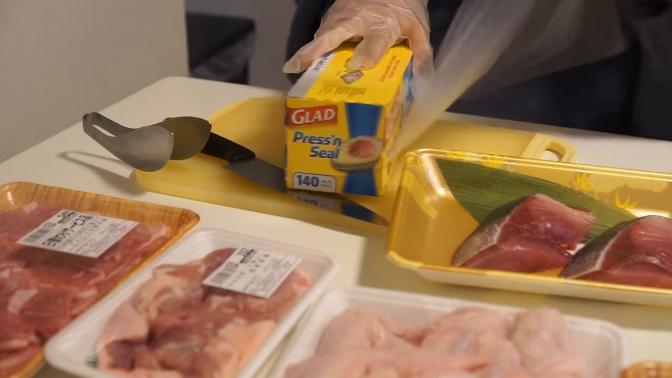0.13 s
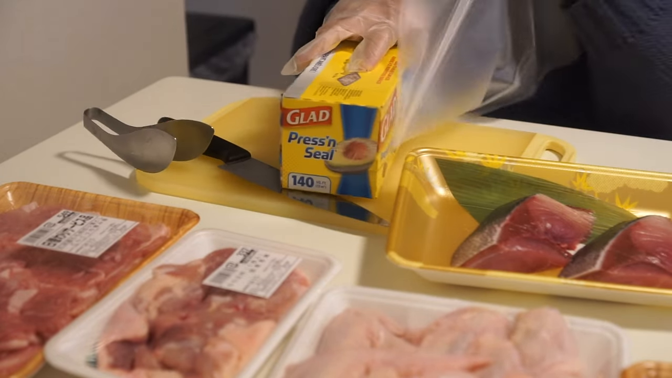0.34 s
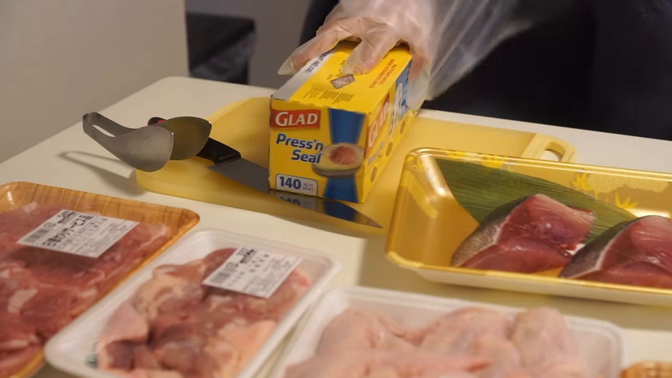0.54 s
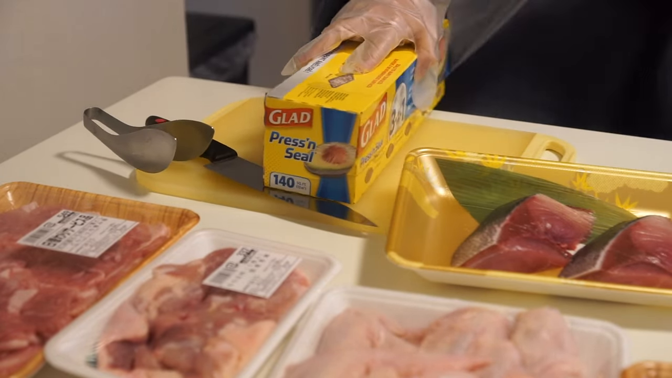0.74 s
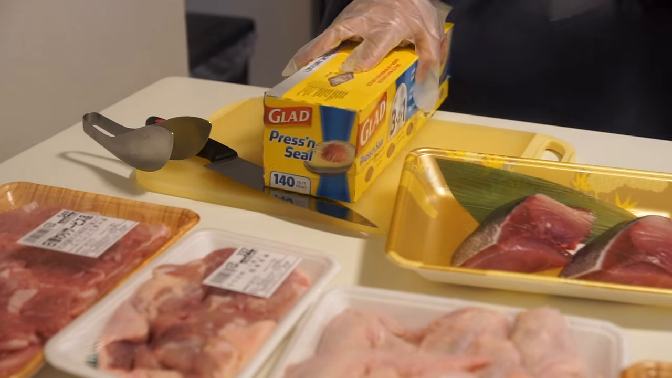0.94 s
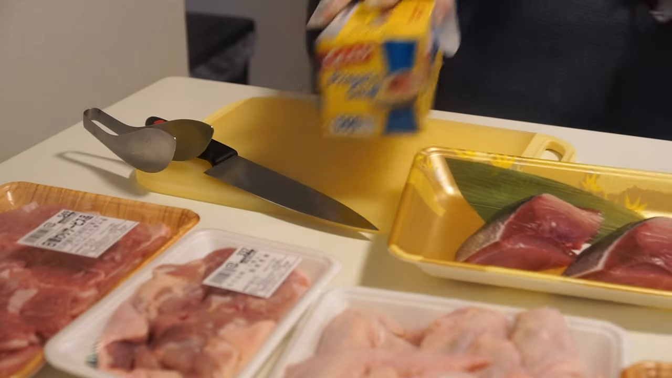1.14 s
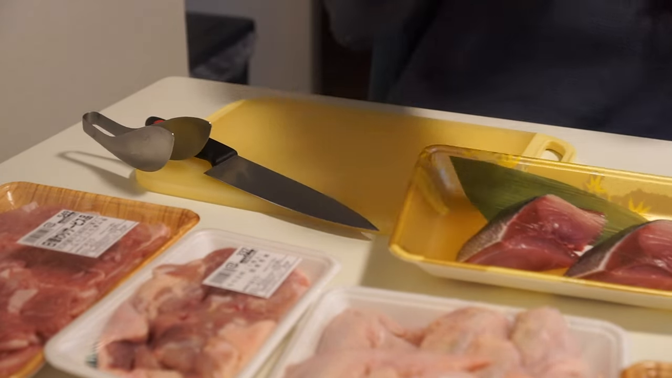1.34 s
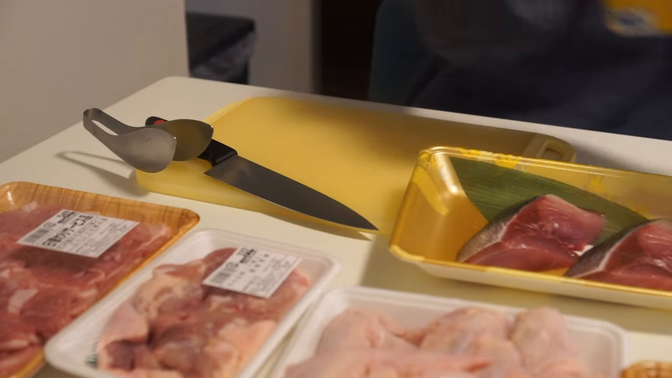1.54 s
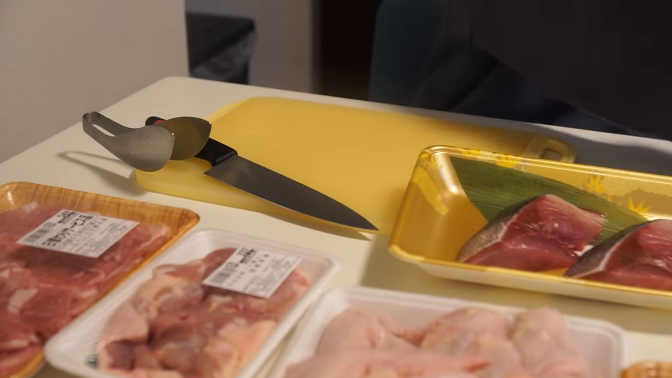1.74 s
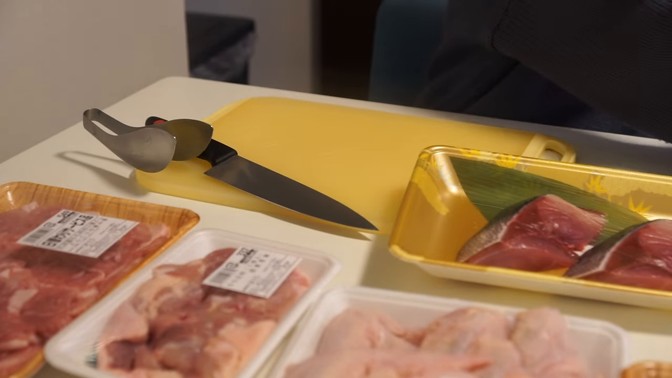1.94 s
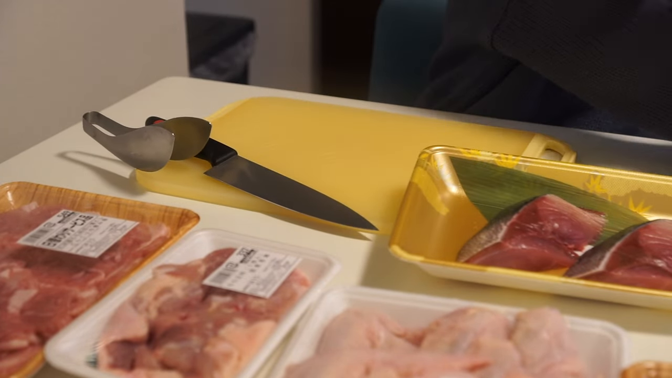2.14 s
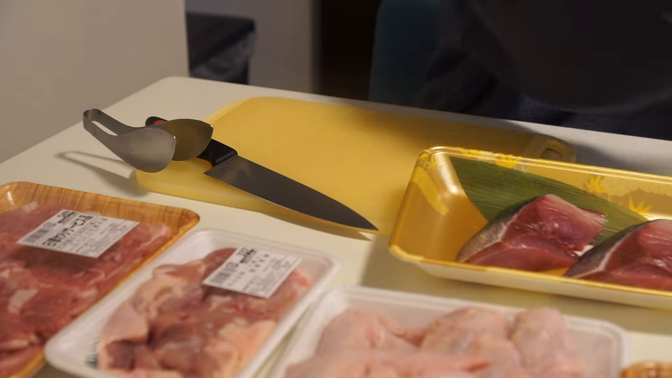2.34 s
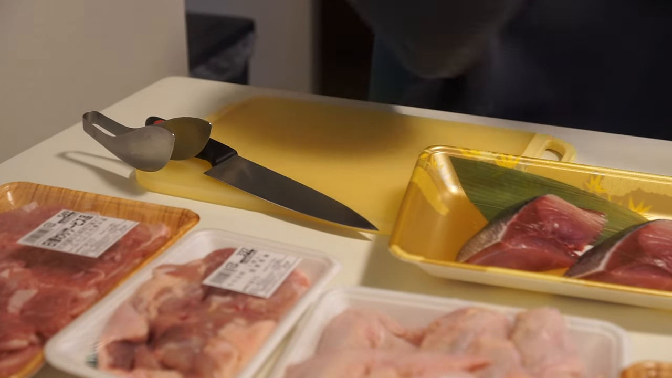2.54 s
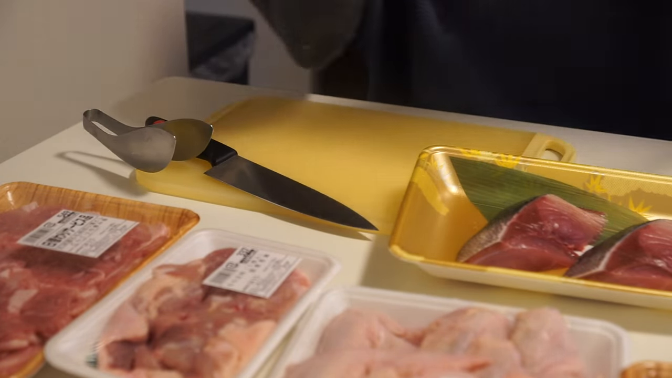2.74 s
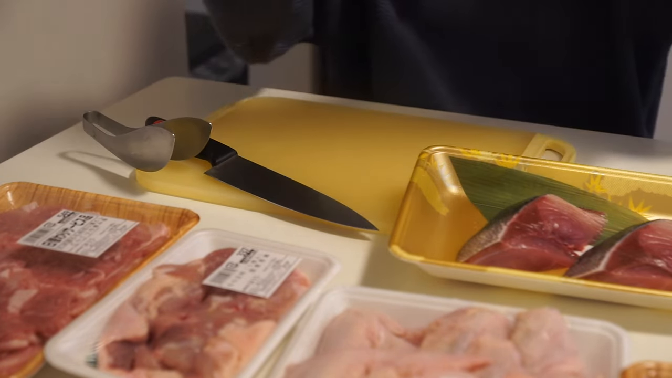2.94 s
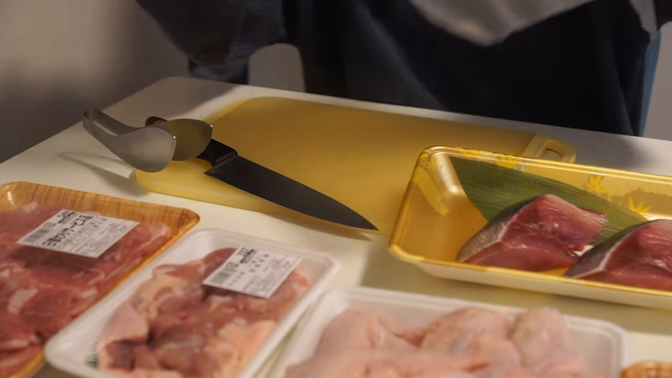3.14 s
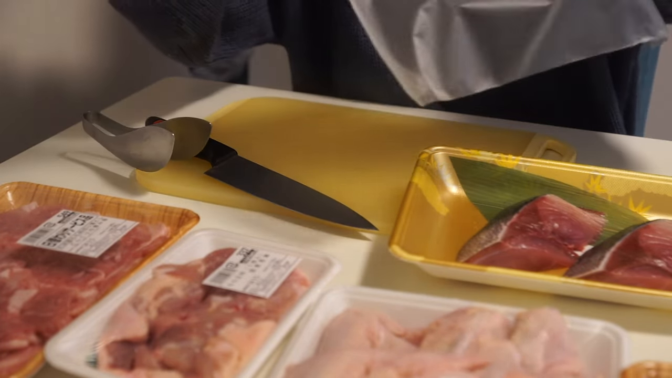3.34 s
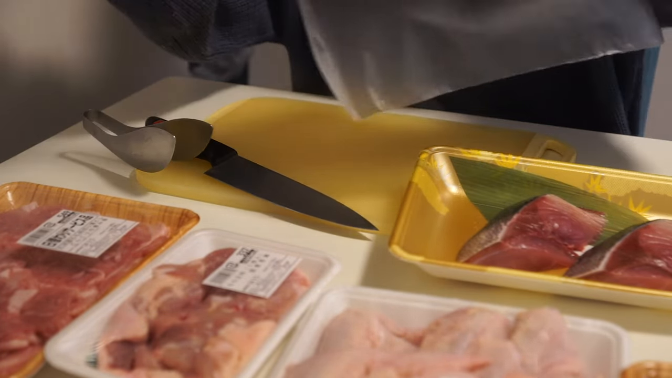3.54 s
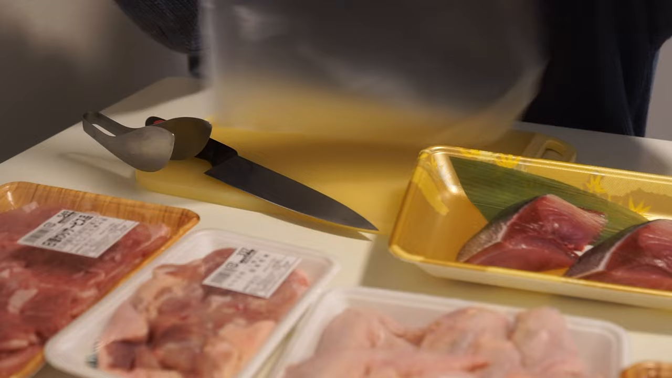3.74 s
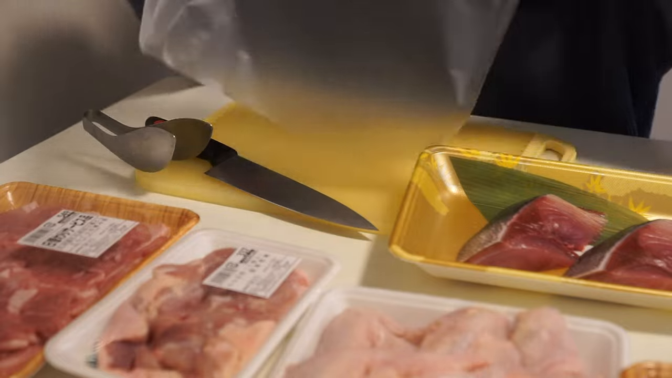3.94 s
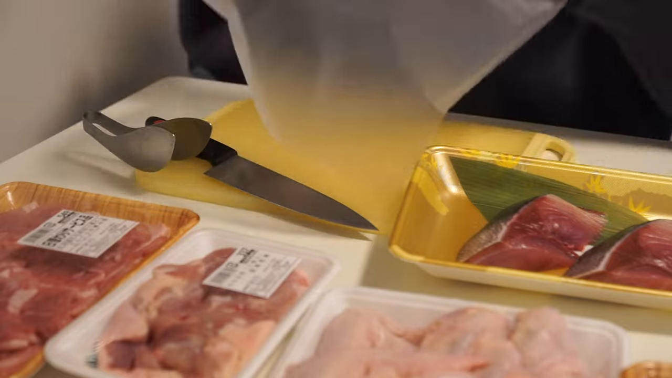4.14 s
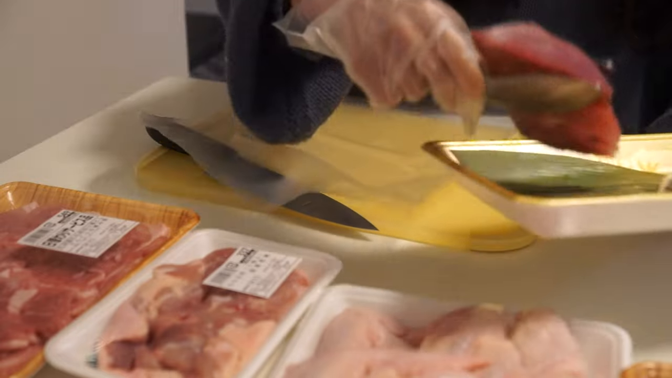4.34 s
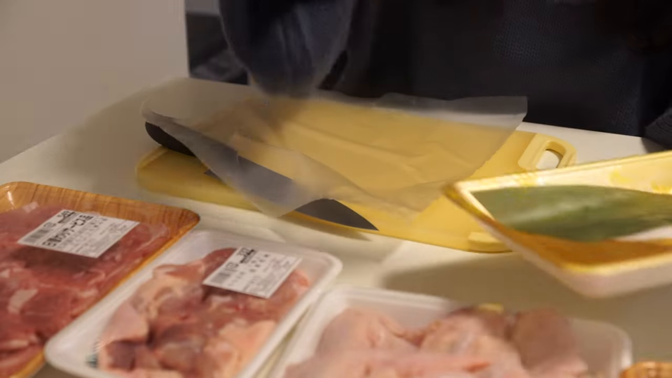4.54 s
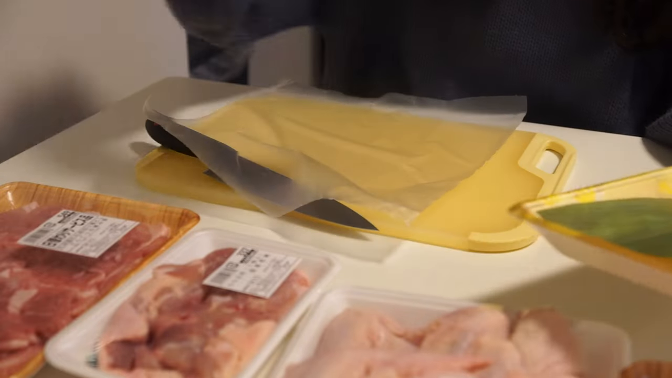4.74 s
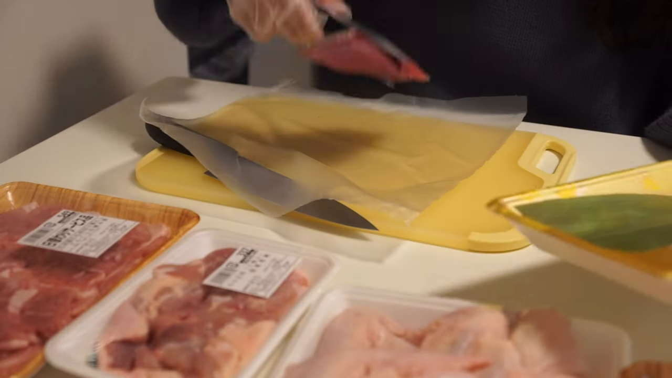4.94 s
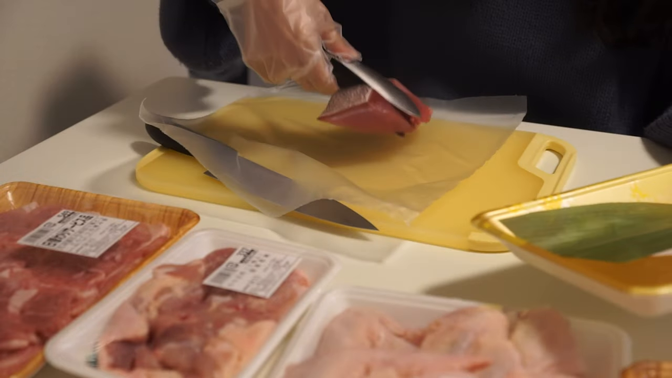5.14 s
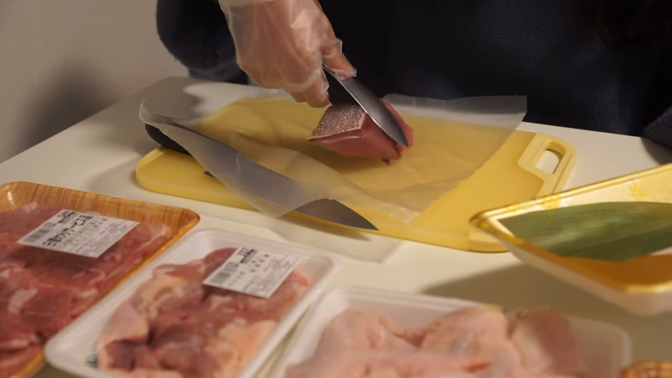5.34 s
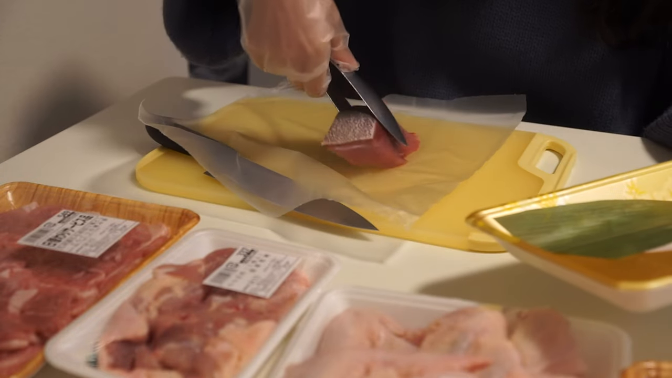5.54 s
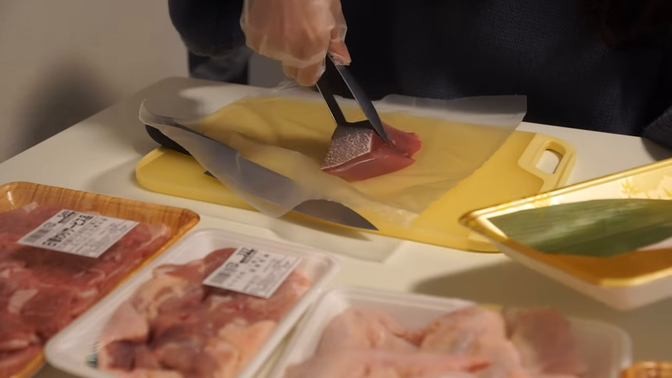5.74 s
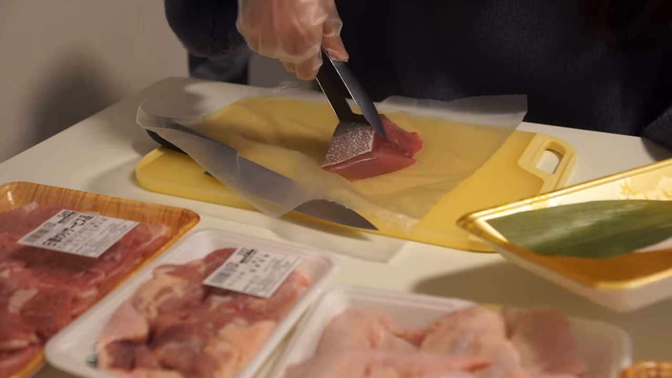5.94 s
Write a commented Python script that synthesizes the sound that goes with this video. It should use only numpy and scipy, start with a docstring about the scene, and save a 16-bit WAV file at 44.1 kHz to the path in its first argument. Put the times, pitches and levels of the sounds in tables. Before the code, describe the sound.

A close stereo microphone in a small kitchen with a short room tail, over low background noise and faint hiss. From the start, sticky plastic wrap peels from a boxed roll: dense bright crackle swells to its loudest around 0.45 to 0.7 seconds, while the roll jerks and drums the hollow cardboard. A snap and box knock come at 0.85, then a strong sharp crack near 1.17 as the film comes free. Quiet follows, until the box is set down with a firm hollow knock at 1.85 and smaller bumps to 2.04. Only faint crinkles and ticks remain until 3.3, when the sheet is shaken out, rustling and snapping to about 3.9. It settles with soft brushing; dull tray and table bumps come at 4.5 to 4.9. Tongs clack lightly at 5.37, then meat drags and taps on the plastic board around 5.6 to 5.75, with small film crinkles.

```python
"""Plastic wrap at a kitchen table

Sticky wrap is peeled off its boxed roll, torn, shaken out and spread: filtered crackle and snapping creases.
The box is knocked and set down, a foam tray is moved and tongs drop meat on a plastic board:
slips and blows excite resonant modes. Sleeves brush and the table thuds, as shaped noise.
A decaying diffuse tail answers from the room, over background noise and hiss.
"""
import sys
import numpy as np
from scipy import signal
from scipy.fft import rfft, irfft, next_fast_len
from scipy.io import wavfile
from scipy.ndimage import map_coordinates

SR = 44100
rng = np.random.default_rng(int(sys.argv[2]) if len(sys.argv) > 2 else 0)


def wrap_up_sound(samples):
    """Save the sound to the file named by the first command line argument, as 16-bit audio."""
    columns = np.atleast_2d(samples).T
    # keep every value between -1 and 1, then stretch to whole-number steps
    tamed = np.clip(columns, -1, 1)
    steps = np.round(tamed * 32767).astype(np.int16)
    wavfile.write(sys.argv[1], SR, steps)


N = 264600  # samples, 6 s

# Movements of the wrap. Each row: time the full level is reached in seconds (the rise comes before it),
# rustle level in dB, rise, hold and fall in seconds,
# flapping and crispness in dB relative to the rustle, left minus right in dB.
WRAP_MOVES = [ (0.0, -43.5, .1, 0.01, 0.23, -4.5, 0, 0.5), (0.238, -35.5, 0.32, 0.01, 0.13, -4, -1.5, 1),
              (0.317, -33.5, .01, 0.011, 0.084, -8.5, -1.5, 1.5),
              (0.359, -34.5, .012, 0.078, 0.25, 1.5, 3, 1), (0.46, -29.5, 0.28, 0.14, 0.26, -3, 0, 1),
              (0.6, -30, 0.27, 0.095, .22, -5, -1.5, 1), (0.84, -36, 0.017, 0, 0.24, 3.5, -2.5, 1),
              (1.098, -35, 0.017, 0.0077, 0.07, 0, -11, 1.5), (1.163, -35, .05, 0.022, 0.16, 3.5, -4.5, .5),
              (1.513, -61, .1, 0.4, 0.52, -1, -2, -0.5), (1.98, -57.5, 0.44, 0.088, 0.24, 2, -3, 0),
              (2.13, -50.5, 0.093, 0.0061, .15, -12, -6, .5),
              (2.248, -59.5, 0.38, 0.12, 0.32, -3.5, -0.5, -.5),
              (2.434, -61.5, 0.11, 0.017, .1, 5.5, -2, .5), (2.52, -60.5, 0.13, 0.21, .3, -0.5, 1, .5),
              (2.74, -57.5, 0.22, 0.02, 0.17, -2, -1, -6), (3.196, -53.5, 0.088, 0.21, .3, -2.5, -0.5, 0.5),
              (3.394, -43.5, 0.46, 0.024, .2, -2, 0.5, 1), (3.455, -36.5, 0.12, 0.022, 0.12, -6, 0.5, 1),
              (3.505, -40.5, 0.054, 0.014, 0.07, -5.5, -0.5, 1),
              (3.537, -36.5, .015, 0.039, .12, -5.5, 1, 1), (3.606, -39, 0.045, 0.014, 0.41, -4, 0, 0.5),
              (3.75, -44.5, .1, .01, .1, -4, 0, 2), (3.803, -44, .012, 0.05, 0.31, -1.5, 1, 1.5),
              (3.916, -47, .1, 0.0029, 0.21, -2, 1, 1.5), (4.193, -55.5, 0.3, 0, .4, -2.5, 0.5, 2),
              (4.273, -51, .015, 0.029, .2, -6, -1, 1.5), (4.4, -48, 0.19, 0.016, 0.14, -7, -3.5, 3),
              (4.932, -55, .015, 0, 0.094, -10, -7, 2), (5.544, -48, 0.034, 0.049, 0.58, -2.5, -2.5, 4.5),
              (5.63, -51.5, .05, 0, 0.36, 2, -11, 0), (5.876, -55.5, 0.2, 0, 0.11, -15, -1.5, 2),
              (5.974, -55.5, 0.045, 0.003, 0.12, -11, 0, 1), ]
# Creases that snap. Each row: start in seconds, level in dB, centre of the noise band in Hz.
CREASE_SNAPS = [(0.3163, -28, 3780), (0.356, -18.5, 3600), (0.84, -18, 5030), (1.0974, -30, 3660),
                (1.1485, -21, 2250), (1.162, -20.5, 8500), (1.1658, -9, 2150), (1.4407, -40, 2200),
                (1.505, -37.5, 2150), (1.618, -39.5, 3850), (1.72, -40.5, 3360), (1.8496, -24, 2220),
                (1.9842, -39, 3230), (2.2424, -38.5, 3200), (2.329, -38, 4900), (2.6258, -36.5, 3270),
                (2.746, -35.5, 3100), (2.806, -37.5, 3280), (2.8678, -37.5, 2100), (3.093, -39.5, 8720),
                (3.1664, -42, 3430), (3.2214, -33, 3340), (3.3345, -23.5, 4130), (3.3796, -37, 3500),
                (3.5329, -19.5, 3400), (3.8067, -27.5, 3470), (3.9987, -29, 2220), (4.1774, -32.5, 7700),
                (4.2684, -28.5, 3120), (4.9313, -43, 3620), (5.5123, -41, 3070), (5.547, -26.5, 3560),
                (5.5781, -28.5, 9330), (5.6875, -31, 3000), (5.724, -27.5, 3000)]
# Spectra of rustle, crispness and flapping. Each row: frequency in Hz, relative density in dB per Hz.
RUSTLE_SPECTRUM = [(1470, -53), (2500, -8), (2850, -3.5), (3060, -1.5), (3320, 0.5), (4500, -3.5),
                   (5500, -6.5), (7150, -9.5), (12100, -120)]
CRISP_SPECTRUM = [(2940, -8.5), (5000, -7), (6430, -1), (10600, -1), (11300, -5.5), (11500, -44),
                  (15000, -60), (22000, -120)]
FLAP_SPECTRUM = [(410, -36), (700, -15), (1030, -1), (1360, 1), (1470, -1), (2090, -0.5), (2500, -5),
                 (3250, -17), (5500, -120)]
SNAP_T60_S, SNAP_ATTACK_S, SNAP_OCTAVES = 0.038, 0.00047, 2.05
CRACK_DB, CRACK_T60_S = 0.5, 0.0072  # the first instant of a snap, over its fizz


def film():
    """Buckling of a thin sheet: flexing gives dense crackle, and the largest creases snap singly."""
    moves = swells(WRAP_MOVES)
    flap_db, crisp_db, pan_db = np.transpose(WRAP_MOVES)[5:]

    def stereo(share_db):
        return np.array([joined(moves, share_db + pan_db / 2), joined(moves, share_db - pan_db / 2)])

    sound = stereo(0) * sheet(RUSTLE_SPECTRUM, spread_db=3.0, clump_db=1.5)
    sound = sound + stereo(crisp_db) * sheet(CRISP_SPECTRUM, spread_db=4.0, clump_db=1.5)
    sound = sound + stereo(flap_db) * sheet(FLAP_SPECTRUM, spread_db=3.5, clump_db=1.5)
    sound = sound * amp(1.02 * wobble(24.98))  # the level flickers by about a decibel

    t = np.arange(SR // 5) / SR
    fizz = amp(-60 * t / SNAP_T60_S)
    crack = amp(CRACK_DB - 60 * t / CRACK_T60_S)
    envelope = (fizz + crack) * (1 - np.exp(-t / SNAP_ATTACK_S))
    ratio = 2 ** (SNAP_OCTAVES / 2)
    for s, db, hz in CREASE_SNAPS:
        puff = rng.standard_normal((2, len(t))) * envelope
        band = signal.butter(2, [hz / ratio, min(hz * ratio, SR / 2.1)], "bandpass", fs=SR)
        pair = [0.65 * puff[0], 0.35 * puff[0] + 0.36 * puff[1]]  # partly alike left and right
        at = round(s * SR)
        sound[:, at:at + len(t)] += amp(db) * signal.lfilter(*band, pair)[:, :N - at]
    return sound


# Tugs of the roll in its box. Each row: time the full level is reached in seconds (the rise comes before it),
# lid level in dB, rise, hold and fall in seconds, drive of walls, base and core in dB relative to the lid.
ROLL_TUGS = [ (0.0, -53.5, .1, 0.0038, 0.079, 3.5, -6.5, -12),
             (0.14, -56.5, 0.028, 0.064, .1, -4, 14.5, -15), (0.195, -42.5, 0.33, 0.049, 0.11, -1, -5, -16),
             (0.317, -42.5, 0.0091, .03, .1, -9, -6, 3), (0.357, -35.5, .015, 0.043, 0.44, 1.5, -4.5, -8),
             (0.572, -30.5, 0.3, 0, 0.082, -7, -11.5, -30), (0.65, -29, .2, .06, 0.22, -5, -20, -8),
             (0.893, -48, 0.36, 0.028, 0.34, -5.5, -7, -11), (1.098, -45, 0.029, 0.12, 0.14, -4.5, -3, -3),
             (1.476, -67.5, .03, 0.0056, 0.14, 5.5, -14, 1), ]
# The roll sticks, then jumps against the box. Each row: start in seconds, level in dB.
ROLL_JERKS = [(0.316, -25.5), (0.357, -23), (0.388, -18), (0.421, -18), (0.454, -20), (0.585, -18),
              (0.681, -24.5), (0.697, -14), (0.714, -31), (0.741, -27)]
# What all jerks share, one row: t60 in seconds, shares of lid, walls, base, core and bare edge in dB.
JERK_SHARES = (0.2, -12.5, -11, -22, -23.5, -7)
# Blows on the box. Each row: start in seconds, level in dB, t60 in seconds,
# shares of lid, walls, base, core and bare edge in dB.
BOX_KNOCKS = [(0.8465, -10.5, 0.081, -4.5, -10, -17, -26.5, -24),
              (1.084, -37, 0.049, -7, -12, -14, -28, -12), (1.095, -20, 0.12, -6.5, -19, -19.5, -44, -1.5),
              (1.166, -24, 0.08, -10, -15, -34, -11.5, 10.5),
              (1.8476, -9.5, 0.13, -5, -8, -20.5, -20.5, -49),
              (1.873, -16.5, 0.14, -4.5, -29, -28, -31, -14),
              (1.892, -24, 0.086, -17, -8.5, -9.5, -28, -21),
              (2.016, -18.5, 0.072, -11.5, -7, -13, -19, -42), (2.039, -28, 0.12, -6.5, -5, -5.5, -23, -26)]
# Modes of the lid, the walls, the broad underside, the roll's hollow core, and the click of a hard contact.
# Each row: frequency in Hz, width in Hz, relative level in dB.
LID_MODES = [(691, 43, -5.5), (850, 55, 1.5), (970, 60, -5), (1085, 78, -4), (1240, 72, -9),
             (1385, 73, -10.5), (1576, 214, -11)]
WALL_MODES = [(470, 60, -2.5), (527, 44.4, -0.5), (624, 76, -1.5)]
BASE_MODES = [(258, 86, -4.5), (311.5, 81, -1)]
CORE_MODES = [(140.7, 22, 0)]
EDGE_MODES = [(2170, 710, -4.5), (4000, 660, -3)]


def box():
    """Stick-slip excitation: the roll peels in jerks that drum the cardboard panels and the hollow core."""
    tugs = swells(ROLL_TUGS)
    walls_db, base_db, core_db = np.transpose(ROLL_TUGS)[5:]
    jerks = crackle(spread_db=3.5, clump_db=2.0)

    def drum(modes, db):
        return joined(tugs, db) * unit(filtered(jerks, body(modes)))

    card = drum(LID_MODES, 0) + drum(WALL_MODES, walls_db) + drum(BASE_MODES, base_db)
    core = filtered(drum(CORE_MODES, core_db), body(CORE_MODES))  # the core resonates twice over
    hits = [(s, db, *JERK_SHARES) for s, db in ROLL_JERKS] + BOX_KNOCKS
    parts = [LID_MODES, WALL_MODES, BASE_MODES, CORE_MODES, EDGE_MODES]
    return card + core + blows(hits, parts, ring_db=[13.8, 19.4, 23, 30.1, 0.97], first_db=2.0)


# Meat and tongs dragging on the board. Each row: time the full level is reached in seconds
# (the rise comes before it), level in dB, rise, hold and fall in seconds.
BOARD_DRAGS = [(5.55, -48, 0.017, 0.045, .1), (5.63, -39.5, 0.099, 0.012, 0.27), (5.75, -47.5, .1, 0, 0.11)]
# Blows on tray and board. Each row: start in seconds, level in dB, t60 in seconds,
# shares of clack, board, table and bare edge in dB.
BOARD_TAPS = [(4.524, -47, 0.072, -29, -19, -5, -21), (4.565, -50, 0.078, -23, -23, -1, -21),
              (4.831, -42, 0.1, -21, -17, -9.5, -31), (4.896, -43, 0.054, -21, -24, -5.5, -23),
              (5.367, -28, 0.1, -1, -17, -36, 0), (5.389, -38, 0.12, 1, -37, -22, -15),
              (5.62, -33.5, 0.075, -2, -2, -29, -11), (5.649, -33, 0.048, -6, -16, -35, -16),
              (5.699, -55, 0.054, -11, -11, -32, -8), (5.751, -33, 0.088, -11, -3.5, -48, -3)]
# Modes of the plastic board, of tongs and tray, and of the table top.
# Each row: frequency in Hz, width in Hz, relative level in dB.
BOARD_MODES = [(296, 20, 7)]
CLACK_MODES = [(455, 140, -5.5), (650, 110, -3), (905, 130, -1), (1236, 260, -4.5), (1650, 360, -10),
               (1930, 87, -5)]
TOP_MODES = [(160, 30, 6)]


def board():
    """Friction and impact: meat and tongs drag in small slips, and blows ring tray, board and table."""
    slips = unit(filtered(crackle(spread_db=2.5, clump_db=1.0), body(BOARD_MODES + CLACK_MODES)))
    parts = [CLACK_MODES, BOARD_MODES, TOP_MODES, EDGE_MODES]
    taps = blows(BOARD_TAPS, parts, ring_db=[11.2, 17.6, 27.2, 4.7], first_db=0.0)
    return joined(swells(BOARD_DRAGS)) * slips + taps


TOUCH_S = 0.00011  # time to the peak of a blow's first hard touch


def blows(table, parts, ring_db, first_db):
    """Modal excitation: one sharp push and a rattle of contact; where a blow lands sets which parts ring."""
    force = np.zeros((len(parts), N + SR))
    t = np.arange(SR // 3) / SR
    touch = amp(first_db) * t / TOUCH_S * np.exp(1 - t / TOUCH_S)
    for s, db, t60, *share_db in table:
        decay = amp(-60 * t / max(t60, .003)) * (1 - np.exp(-t / 0.0012))
        contact = rng.standard_normal(len(t)) * decay - touch
        part_gain = amp(db + np.add(share_db, ring_db))[:, None]
        force[:, round(s * SR):][:, :len(t)] += part_gain * contact
    return sum(filtered(push[:N], body(part)) for push, part in zip(force, parts))


# Brushing of sleeves and tray. Each row: time the full level is reached in seconds
# (the rise comes before it), level in dB, rise, hold and fall in seconds.
BRUSHES = [(2.74, -64.5, .3, 0.024, .16), (3.55, -50.5, 0.67, 0, .58), (3.81, -56, 0.037, 0.042, .7),
           (4.32, -54.5, .03, 0, 0.034), (4.43, -60, 0.31, 0.011, .2), (4.53, -66, .07, 0, .2),
           (4.75, -62.5, 0.41, 0, .2), (4.84, -50, 0.057, 0, 0.19), (5.0, -65.5, 0.11, 0.54, .1)]
# Leaning on the table. Each row: time the full level is reached in seconds (the rise comes before it),
# level in dB, hold in seconds.
LEANS = [(0.0, -68, 0.11), (0.32, -71, 0.21), (0.85, -66, 0), (1.17, -75, .1), (1.877, -50, 0),
         (2.04, -68.5, 0.24), (3.3, -74, 0.34), (3.93, -71, 0), (4.494, -61, .06), (4.696, -60, 0.039),
         (4.827, -57, 0.053), (5.02, -70, .2), (5.306, -66, 0.21), (5.65, -59, 0), (5.82, -63, 0.14)]
# Spectra of the brushing and of the table's thud. Each row: frequency in Hz, relative density in dB per Hz.
BRUSH_SPECTRUM = [(110, -46), (180, -7), (306, 2.5), (676, -3.5), (1030, -6), (1300, -14), (1690, -18),
                  (2860, -120)]
THUD_SPECTRUM = [(12, -49), (20, -15), (32, -11), (54, 5), (92, -1.5), (140, -2.5), (180, -16), (310, -120)]
LEAN_RISE_S, LEAN_FALL_S, TABLE_REST_DB = .1, 0.14, -76.5


def handling():
    """Broadband friction and low-frequency loading: sleeves and tray brush, the table thuds under weight."""
    brushing = joined(swells(BRUSHES)) * sheet(BRUSH_SPECTRUM, spread_db=1.0, clump_db=-0.5)
    leans = [(s, db, LEAN_RISE_S, hold, LEAN_FALL_S) for s, db, hold in LEANS]
    leaning = joined(swells(leans)) + amp(TABLE_REST_DB)
    return brushing + leaning * sheet(THUD_SPECTRUM, spread_db=1.0, clump_db=0.5)


# Decay of the room. Each row: frequency in Hz, t60 in seconds.
ROOM_DECAY = [(100, 0.49), (700, 0.25), (3000, 0.49), (11000, 0.23)]
# Coherence of the room's answer. Each row: frequency in Hz, left-right likeness from 0 to 1.
ROOM_LIKENESS = [(60, 0.68), (150, 0.99), (400, 0.6), (1000, 0.48), (3000, 0.18), (11000, .05)]


def kitchen(x):
    """Diffuse reverberation: each frequency of the room's answer dies at its own speed."""
    hz, t, noise = signal.stft(rng.standard_normal((2, N)), SR, nperseg=256)
    decay = amp(-60 * t / along(ROOM_DECAY, hz)[:, None])
    pair = signal.istft(noise * decay, SR, nperseg=256)[1][:, :N]
    tail = wide(*pair, ROOM_LIKENESS)[:, :SR // 2]
    delayed = np.pad(x, (200, 0))[None]  # 200 samples, 4.5 ms
    return signal.fftconvolve(delayed, tail / np.linalg.norm(tail[0]), axes=1)[:, :N]


# Spectra of the common and the opposed background. Each row: frequency in Hz, relative density in dB per Hz.
COMMON_SPECTRUM = [(12, -39), (20, -20), (59, -13.5), (197, -2.5), (373, -9), (437, -5.5), (705, -6.5),
                   (1020, -9), (1570, -7.5), (2530, -10), (7320, -13.5), (10600, -17), (11500, -26),
                   (15000, -68), (22000, -120)]
OPPOSED_SPECTRUM = [(12, -52), (20, -27), (197, -4), (286, -4), (335, -2), (996, -3), (1410, -6.5),
                    (2100, -8), (2460, -10), (10300, -18), (11500, -27), (15000, -64), (22000, -120)]
# Level of the opposed part, swelling toward the end. Each row: time in seconds, level in dB.
OPPOSED_LEVEL = [(0, -58), (1.5, -60.5), (2.3, -58.5), (3, -60.5), (4.1, -60.5), (4.4, -55.5), (5.2, -56.5),
                 (6, -55)]
AIR_DB = -61  # level of the common part


def air():
    """Sum and difference noise: a steady background noise common to both channels, a hiss opposed in them."""
    def hush(spectrum):
        return unit(filtered(crackle(spread_db=0.5, clump_db=0.8), lambda hz: amp(along(spectrum, hz))))

    common = amp(AIR_DB) * hush(COMMON_SPECTRUM)
    opposed = amp(curves(OPPOSED_LEVEL)[0]) * hush(OPPOSED_SPECTRUM)
    return common + opposed * [[1], [-1]]


# Coherence of near sources. Each row: frequency in Hz, left-right likeness from 0 to 1.
NEAR_LIKENESS = [(60, 0.95), (250, 0.94), (700, 0.81), (1500, 0.64), (4000, 0.54), (11000, 0.36)]


def sheet(spectrum, spread_db, clump_db):
    """Distributed radiation: stereo crackle of rms 1 from many points of a broad surface."""
    pair = wide(crackle(spread_db, clump_db), crackle(spread_db, clump_db), NEAR_LIKENESS)
    return unit(filtered(pair, lambda hz: amp(along(spectrum, hz))))


def crackle(spread_db, clump_db):
    """Impulsive noise: tiny slips, one a sample, most weak, a few strong, arriving in clumps."""
    size_db = spread_db * np.minimum(rng.exponential(size=N), 5) + clump_db * wobble(60)
    return unit(rng.standard_normal(N) * amp(size_db))


def wide(mono, other, alike):
    """Interchannel coherence: an angle per frequency splits mid and side to set the left-right likeness."""
    def turn(hz):
        return np.arccos(np.clip(along(alike, hz), -1, 1)) / 2

    mid, side = filtered(np.array([mono, other]), lambda hz: np.array([np.cos(turn(hz)), np.sin(turn(hz))]))
    return np.array([mid + side, mid - side])


def body(modes):
    """Modal superposition: the causal response of a few resonances, with alternating signs."""
    def response(f):
        return sum((-1) ** k * amp(db) * 1j * f * width / (centre * centre - f * f + 1j * f * width)
                   for k, (centre, width, db) in enumerate(modes))

    return response


SWING_DB = 30  # what a rise or fall time spans


def swells(rows):
    """Exponential growth and decay: each row's gain rises to its time, holds and falls in straight dB lines."""
    s, db, rise, hold, fall = np.abs(np.transpose(rows)[:5, :, None]) + 1e-4  # db is now attenuation
    t = np.arange(0, N + 32, 32) / SR  # one point every 32 samples
    distance = np.maximum(0, np.maximum((s - t) / rise, (t - s - hold) / fall))
    return amp(-db - SWING_DB * distance)


def joined(gains, share_db=0):
    """Incoherent summation: overlapping movements add their powers, giving one gain per sample."""
    coarse = np.sqrt(np.sum((gains.T * amp(share_db)) ** 2, axis=1))
    return np.interp(np.arange(N), 32 * np.arange(len(coarse)), coarse)


def filtered(x, response):
    """Linear filtering: the spectrum of x times a complex response of frequency."""
    m = next_fast_len(N + SR // 2)
    return irfft(rfft(x, m) * response(np.fft.rfftfreq(m, 1 / SR)), m)[..., :N]


def wobble(rate):
    """Band-limited fluctuation: a smooth random curve through rate knots a second."""
    knots = rng.standard_normal(int(N * rate / SR) + 4)
    return map_coordinates(knots, [np.arange(N) * rate / SR])


def curves(rows):
    """Linear interpolation in time: one value per sample for each column, -120 outside the table."""
    s, *cols = np.transpose(rows)
    return [np.interp(np.arange(N) / SR, s, c, left=-120, right=-120) for c in cols]


def along(points, hz):
    """Logarithmic frequency scale: interpolates (Hz, value) points on it."""
    f, v = np.transpose(points)
    return np.interp(np.log(hz + 1), np.log(f + 1), v)


def amp(db):
    """Level to amplitude: 20 dB is a factor of ten."""
    return 10 ** (np.asarray(db) / 20)


def unit(x):
    """Normalization of power: scales x to rms 1."""
    return x / np.sqrt(np.mean(x ** 2) + 1e-20)


def scene():
    """Superposition: direct sound of solids and wrap, the room's answer, handling and air."""
    # small objects send out little bass, and a blunt contact little treble
    solids = filtered(box() + board(), lambda hz: (1j * hz / (90 + 1j * hz)) ** 2 / (1 + 1j * hz / 4500))
    wrap = filtered(film(), lambda hz: (1j * hz / (300 + 1j * hz)) ** 2)
    room = amp(-5) * kitchen(solids) + amp(-11.5) * kitchen(wrap.mean(axis=0))

    def lag(hz):
        # the table is a little nearer the right: the left arrives 12 microseconds later
        return np.exp(-2j * np.pi * hz * np.array([[.000012], [0]]))

    return filtered(solids + wrap, lag) + room + handling() + air()


TOP_HZ = 11060  # band limit


def record(dry):
    """Band limitation: the gain drops 18 dB at the limit, then slopes to -60 dB over 1500 Hz."""
    def response(hz):
        loss_db = np.clip((hz - TOP_HZ) / 1500, 0, 1) * 42 + 18
        return amp(-loss_db) ** (hz > TOP_HZ)  # gain 1 below the limit

    return filtered(dry, response)


dry = scene()
out = record(dry)
wrap_up_sound(out)
```